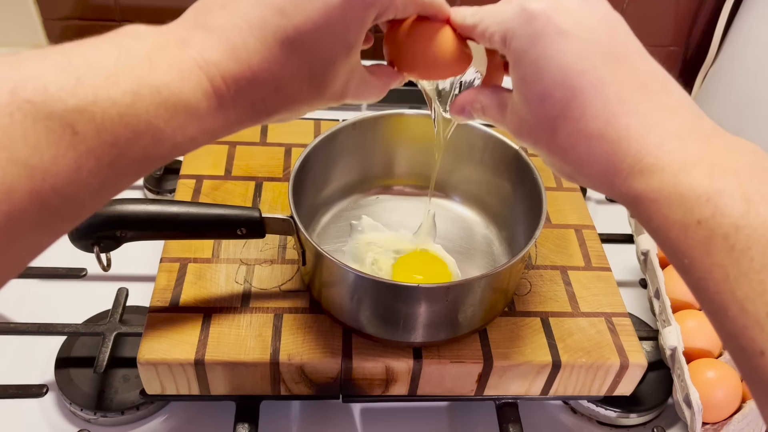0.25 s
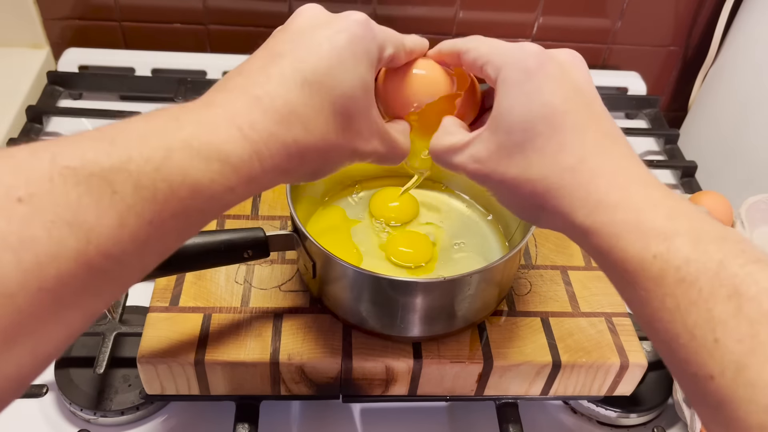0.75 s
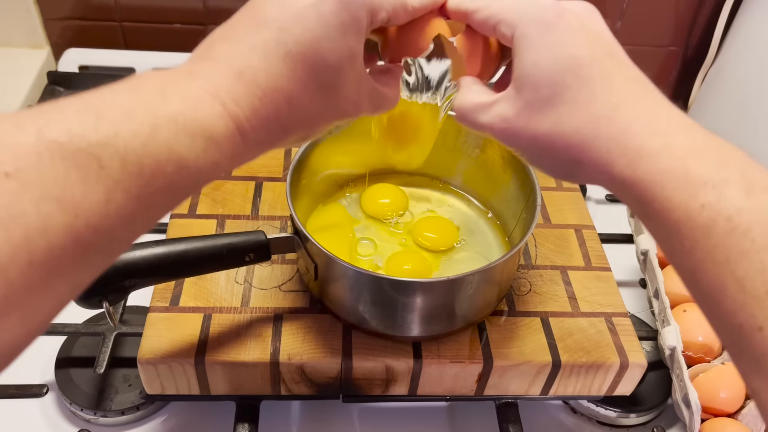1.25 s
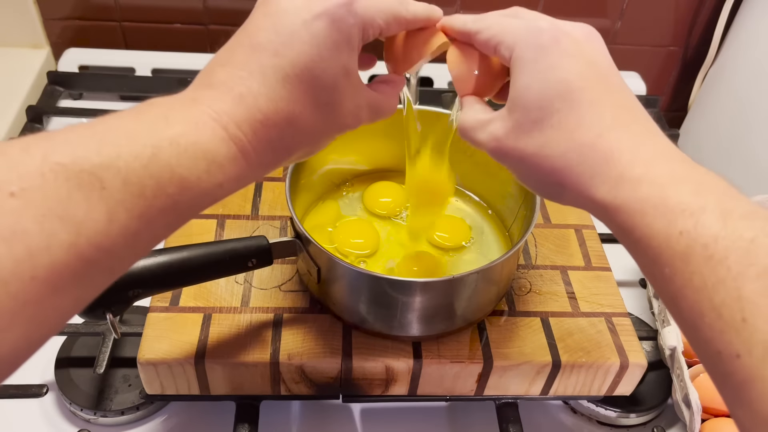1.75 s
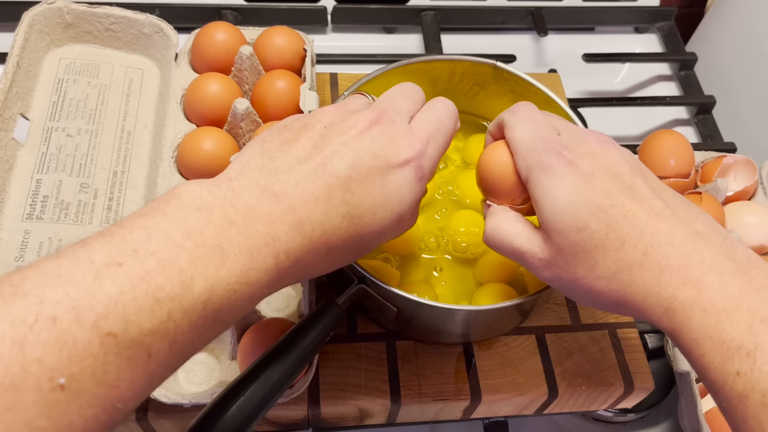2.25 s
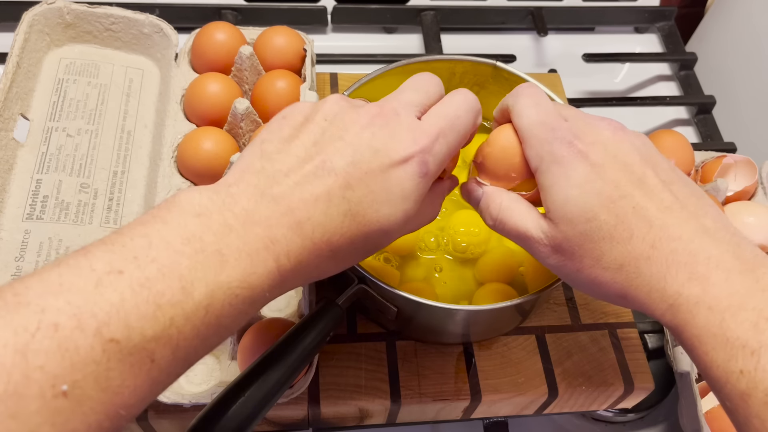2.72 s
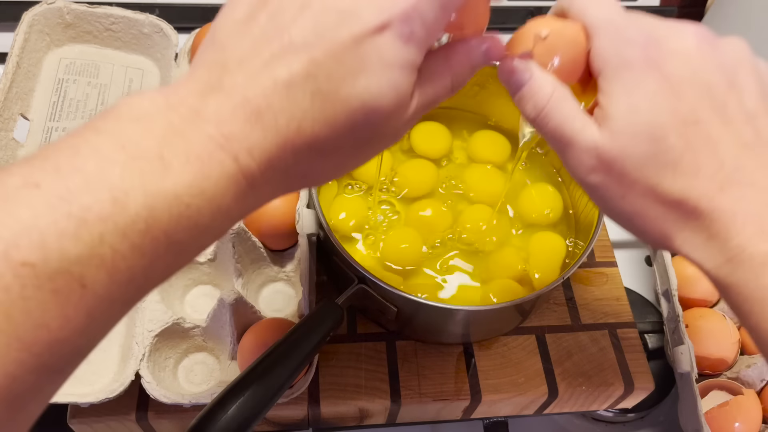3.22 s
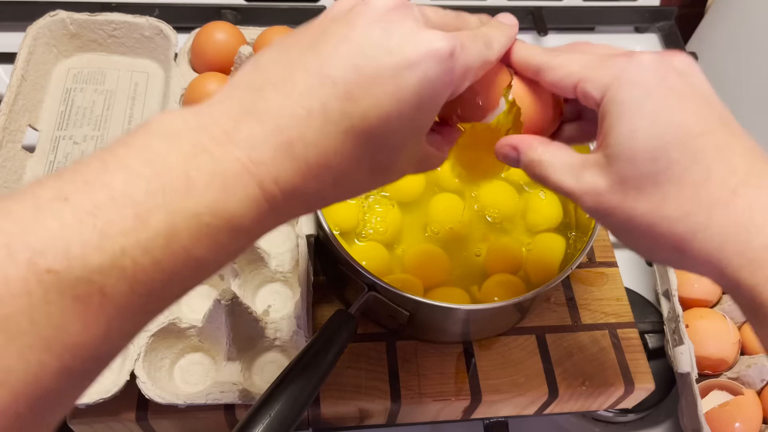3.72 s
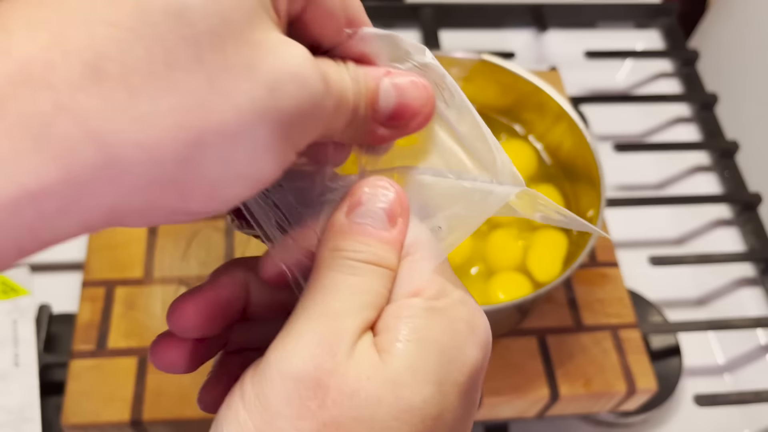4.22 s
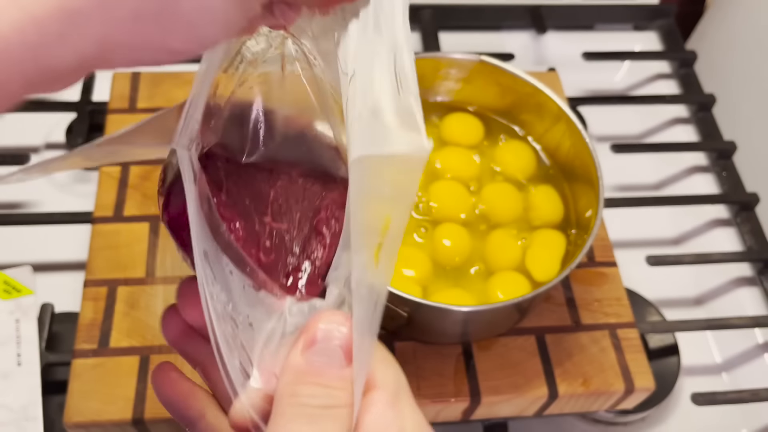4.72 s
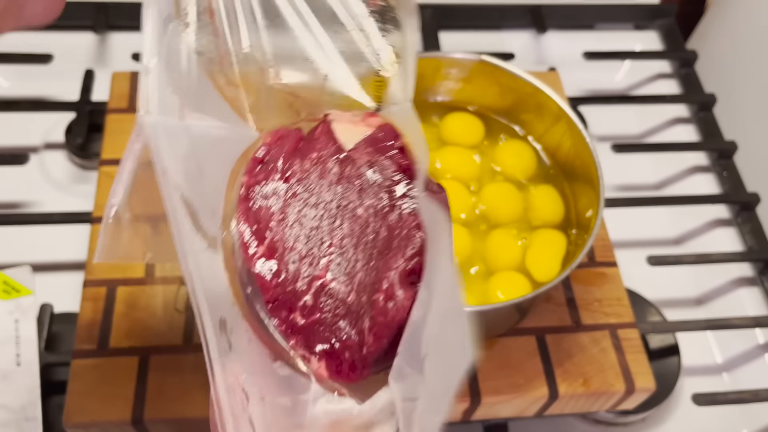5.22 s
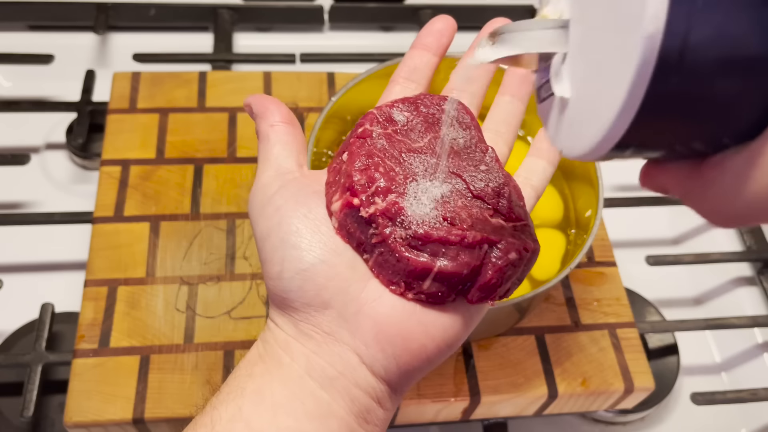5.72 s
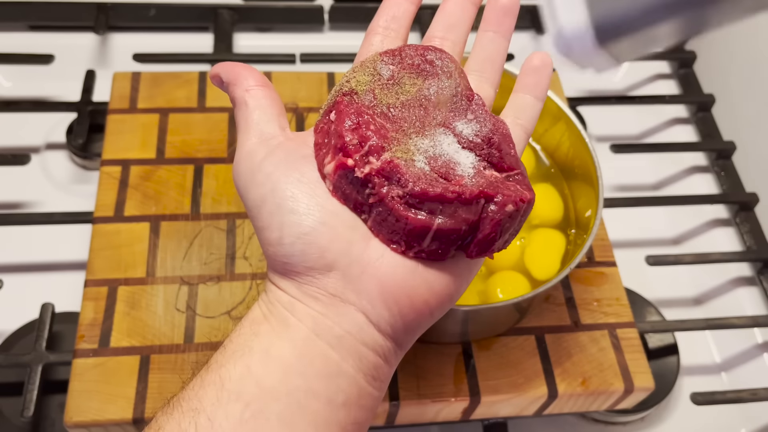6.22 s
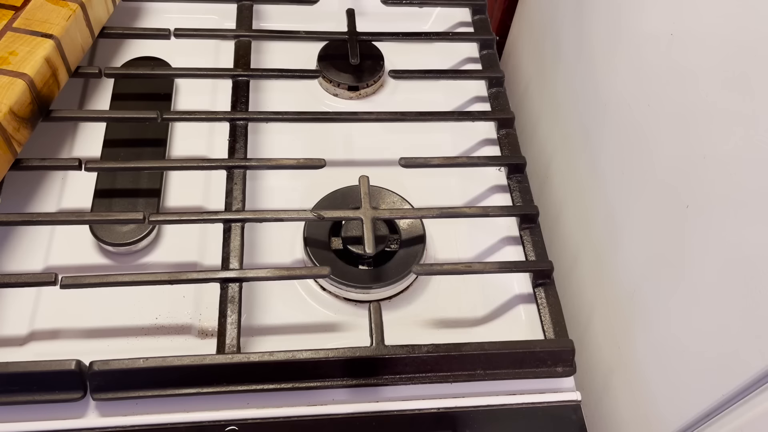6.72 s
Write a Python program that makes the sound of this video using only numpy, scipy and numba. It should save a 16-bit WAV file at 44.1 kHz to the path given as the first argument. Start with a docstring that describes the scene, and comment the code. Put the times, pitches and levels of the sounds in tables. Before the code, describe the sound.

Close stereo sound of cooking: a rapid run of brittle, wet eggshell cracks and crumbling, ringing slightly in a metal pan, growing louder and denser before easing off. Next come harsh plastic crinkles, hard snaps and a short tear. Quiet grainy seasoning and tiny lid ticks follow, then two bright, sharp stove sparks and a soft rush of gas catching. A low appliance hum stays beneath, with short room echo.

```python
"""A fridge hums throughout in a small kitchen, made from shaped noise and one low tone. Eggs are broken by hand
over a pan: bursts of noise ring the shells and the pan, crumbs crackle, soft knocks fall, egg white squelches.
Then a stiff plastic bag rustles, snaps, creaks and tears, made from clicks, bursts, hiss and short sinking tones.
Salt pours and pepper is shaken out as grainy hiss and rattle, and a gas ring sparks twice and catches in
fluttering noise. A pair of close microphone ports listens."""
import sys
import numpy as np
from scipy import signal
from scipy.fft import rfft, irfft, next_fast_len
from scipy.io import wavfile
from scipy.ndimage import uniform_filter1d
from numba import njit

SR = 44100
rng = np.random.default_rng(int(sys.argv[2]) if len(sys.argv) > 2 else 0)


def digitize_waveform(pressure):
    """Quantize a signal to 16-bit integers and store it at the path in sys.argv[1].

    Rows of a 2-D input are taken as channels; values are limited to [-1, 1].
    """
    field = np.atleast_2d(pressure).T
    bounded = np.clip(field, -1, 1)
    quanta = np.round(bounded * 32767).astype(np.int16)
    wavfile.write(sys.argv[1], SR, quanta)


def elevation(decibels):
    """Turn decibel levels (scalar or array-like) into linear amplitude ratios."""
    levels = np.asarray(decibels, float)
    return 10 ** (levels / 20)


N = 306891

# Steady kitchen sound. Each row: frequency in Hz, strength in dB per Hz.
ROOM_TONE = [(24, -33.5), (40, 1.5), (122, -3.5), (156, -10.5), (186, -7.5), (212, -11.5), (244, -7.5),
             (310, -17), (418, -24.5), (865, -35.5), (1880, -37.5), (4070, -43.5), (7100, -45.5),
             (9260, -33.5), (11200, -40.5), (12200, -61)]
ROOM_TONE_DB, HUM_HZ, HUM_DB = -61.5, 119, -66
# Shell crumbling between the fingers. Each row: time in seconds, level in dB, middle ring in Hz.
CRUNCH = [(0.0, -60, 2440), (0.3, -85, 3000), (0.83, -61.5, 1700), (1.05, -87, 1600), (1.2, -70.5, 2140),
          (1.48, -78.5, 2170), (1.68, -75, 1300), (1.75, -101, 1530), (1.82, -61, 2770), (2.01, -78, 1240),
          (2.118, -65, 1260), (2.135, -70.5, 2000), (2.31, -59.5, 2910), (2.53, -64.5, 2600),
          (2.62, -46.5, 2250), (2.93, -51, 2160), (3.01, -69, 2320), (3.42, -72, 2260), (3.53, -72.5, 1920),
          (3.57, -56.5, 1530), (3.75, -70.5, 1410), (4.11, -100, 2810)]
CLUMP_DB = 3.5   # unevenness of the crumbling
# Hard crumbling is bright; below a level in dB the treble falls away, in dB per dB.
CRUNCH_TREBLE_DB, BRIGHT_ABOVE_DB, TREBLE_FADES = 2, -63, 0.22
# Air in the pan. Each row: frequency in Hz, width in Hz, strength in dB.
PAN_AIR = [(594, 276, 9), (1260, 35, 1)]
# How the pan's air answers, most when the hands reach down into it.
# Each row: time in seconds, answer in dB before the drive below is added.
PAN_ANSWER = [(0.0, -43), (0.14, -9), (0.19, -23), (0.7, -40), (0.785, -20), (0.85, -19), (1.5, -39),
              (2.0, -25), (2.17, -16), (2.21, 0), (2.33, -12.5), (2.6, -13), (2.8, -26), (3.3, -27),
              (4.1, -15)]
CRACK_IN_PAN_DB, CRUNCH_IN_PAN_DB = 7.5, 10   # how hard a crack and the crumbling drive that air
# Shell cracks; each layer adds its own trim to the levels. Each row: start in seconds, level in dB,
# ring of the hollow shell in Hz, treble in dB against the level, wetness from 0 to 1.
CRACKS = [(0.1009, -37, 2820, -0.5, 0.6), (0.136, -39, 1380, 1, 0.6), (0.1848, -37, 2600, -0.5, 0.45),
          (0.1902, -23, 3260, -6, 0.64), (0.267, -47.5, 3000, -0.5, 0.8), (0.372, -67, 2000, 6.5, 1),
          (0.4436, -32.5, 2420, -12, 0.24), (0.497, -51.5, 1230, -9, 1), (0.525, -51, 2900, 7.5, 0.4),
          (0.531, -45, 2850, 2.5, 0.44), (0.599, -34.5, 1700, -3, 0.27), (0.636, -43, 2740, -12, 0.14),
          (0.684, -37.5, 1690, -3, 0.4), (0.712, -37.5, 1940, -10, 0.45), (0.744, -42, 1800, -24, 0.7),
          (0.7846, -39, 2560, -7, 0.2), (0.786, -30.5, 1340, -6, 1), (0.849, -39.5, 1380, -9, 1),
          (0.952, -45.5, 1340, -6.5, 0.7), (1.0194, -54.5, 1730, 7.5, 0.7), (1.111, -50, 1830, 0, 0.4),
          (1.135, -53.5, 1720, 11, 0.7), (1.175, -43.5, 2280, 3.5, 0.6), (1.2044, -34, 2200, -3, 0.32),
          (1.238, -44.5, 1460, 7, 0.32), (1.281, -29, 2090, -12, 0.42), (1.377, -45, 3100, -3.5, 0.36),
          (1.415, -35, 2490, -18, 0.65), (1.452, -36.5, 2000, -17, 0.48), (1.5643, -25, 1920, -17.5, 0.51),
          (1.6304, -32.5, 1510, -17, 0.64), (1.665, -22.5, 1444, -17.5, 0.82),
          (1.7642, -39, 1900, -18, 0.7), (1.8048, -43.5, 2100, -2, 0.6), (1.8203, -20.5, 4250, -37, 0.06),
          (1.916, -27, 2140, -26, 1), (1.9288, -23.5, 2220, -28, 0.4), (1.938, -8, 2110, -25, 0.54),
          (1.95, -13, 1950, -22.5, 0.63), (1.9759, -18, 1530, -24, 0.82), (1.9908, -21, 1550, -14, 0.6),
          (2.0095, -17.5, 1490, -20, 0.05), (2.015, -27, 1660, -22, 1), (2.192, -44, 3100, -3, 0.4),
          (2.2055, -30, 2830, -15, 0.5), (2.2196, -51, 2840, 15.5, 0.7), (2.2518, -50.5, 1030, 14, 0.34),
          (2.3102, -41, 2700, 8, 0.3), (2.3174, -29, 2730, 1, 0.48), (2.339, -15.5, 3400, -12, 0.2),
          (2.389, -50, 2360, 11, 0.64), (2.4168, -56, 2770, 19, 0.6), (2.4806, -39, 3540, 7, 0.1),
          (2.4981, -34.5, 3580, 4.5, 0.5), (2.536, -32, 3610, -10, 0.23), (2.5522, -32.5, 2860, -3.5, 0.4),
          (2.566, -28.5, 3500, -15, 0.3), (2.583, -19, 2850, -8, 0.13), (2.596, -22, 2760, -10.5, 0.3),
          (2.62, -21, 1920, -5.5, 0.1), (2.644, -22.5, 994, 0.5, 0.08), (2.6748, -17, 2730, -9.5, 0.1),
          (2.7085, -27.5, 2660, 3, 0.2), (2.7203, -23.5, 3130, -3, 0.46), (2.731, -33.5, 3010, 8.5, 0.9),
          (2.757, -32, 2670, 7.5, 0.3), (2.7685, -30.5, 2000, -0.5, 0), (2.774, -47.5, 2450, 20.5, 0.5),
          (2.8076, -31, 3400, 1.5, 0.5), (2.8205, -34, 2200, -10, 0.3), (2.832, -8.5, 2900, -8.5, 0.21),
          (2.876, -17.5, 1750, -48.5, 0.27), (2.908, -22, 1760, -8, 1), (2.9127, -21, 2680, -10.5, 1),
          (2.948, -26.5, 1870, -6, 0.03), (3.021, -35.5, 2750, -5.5, 0.34), (3.05, -34.5, 2740, -4.5, 0.65),
          (3.091, -42, 2180, -1.5, 0.5), (3.1206, -44, 2280, -22, 0.15), (3.153, -41, 2780, -12, 0),
          (3.1747, -34, 2650, -19, 0.24), (3.2159, -41.5, 2720, 7, 0.18), (3.2269, -26, 2750, -6, 0.56),
          (3.257, -36, 1480, -9, 1), (3.2764, -30, 1500, -9, 0.2), (3.316, -29, 2780, -12.5, 0.1),
          (3.3443, -29.5, 2370, -10.5, 0.3), (3.4068, -18, 2590, -8, 0.12), (3.55, -31.5, 1580, -9.5, 1),
          (3.5741, -14.5, 1690, -4, 0.61), (3.629, -33.5, 1360, -28, 0.5), (3.6847, -34.5, 3170, 4, 0.2),
          (3.699, -32, 3120, -10, 0), (3.77, -35, 1440, -20.5, 0.33), (3.802, -43.5, 1400, -26, 0.7),
          (3.808, -48, 3310, 4.5, 0.7), (3.855, -53, 1860, -4.5, 0.74), (3.9407, -50, 1990, 1, 0.35),
          (4.013, -52, 2620, -2, 0.4)]
DRY_T60_S, WET_T60_S = 0.026, 0.15   # time to fall 60 dB for a dry and a fully wet shell
DULL_BELOW_DB, SWELL_S = -13.5, 0.0011   # cracks with less treble are muffled; their extra swelling time
RAGGED_DB, LUMP_S = 3.0, 0.003   # a fracture sputters as it dies: unevenness, spacing of the lumps
# The empty pan sings; egg damps it.
PAN_RING_HZ, PAN_RING_WIDTH_HZ, PAN_RING_DB, FILL_DB_PER_S = 5430, 140, -1.5, 18.5
# Echo of the walls. Each row: frequency in Hz, time in seconds to fall 60 dB.
KITCHEN_T60 = [(200, 0.21), (1500, 0.16), (5000, 0.25), (12000, 0.15)]
KITCHEN_DB = -12
# Soft knocks of hands, yolks and bag. Each row: start in seconds, peak in dB, pitch in Hz, number of cycles.
THUMPS = [(0.503, -40.5, 71.6, 2.2), (0.783, -46.5, 120, 2.2), (0.849, -46, 57, 2.2), (0.894, -44, 99, 3.1),
          (5.151, -37.5, 167, 2.2), (5.1925, -23.5, 600, 9.5), (6.038, -46, 52.4, 2.2)]
# Air in egg white. Each row: time in seconds, pitch in Hz, level in dB.
SQUELCH = [(3.7, 1060, -54.5), (3.765, 1285, -62), (3.772, 1290, -65)]
# Bag rustling. Each row: time in seconds, crinkle in dB, flap in dB.
RUSTLE = [(4.11, -66.5, -86), (4.144, -66, -65.5), (4.266, -58, -86), (4.444, -42, -45), (4.746, -65, -70),
          (5.008, -37.5, -23), (5.06, -58.5, -81), (5.132, -58.5, -59.5), (5.202, -57, -38),
          (5.304, -63.5, -70.5), (5.36, -66, -67.5)]
# Tone of the fine creases. Each row: frequency in Hz, strength in dB per Hz.
CRINKLE = [(410, -39), (700, -22), (984, -21), (1230, -4.5), (2880, -7.5), (8760, -9), (10100, -7.5),
           (11500, -13), (16000, -49.5)]
# Tone of the flapping sheet. Each row: frequency in Hz, strength in dB per Hz.
FLAP = [(40, -20.5), (100, -3), (350, -6.5), (600, -0.5), (1000, -13.5), (1800, -28)]
# Bag folds snapping; each layer adds its own trim to the levels. Each row: start in seconds, level in dB,
# flap of the sheet in dB against the level, flap pitch scale in Hz, treble in dB against the level.
SNAPS = [(4.123, -41, -22, 326, 3.5), (4.149, -39.5, -28, 318, 3), (4.1719, -41.5, -23, 820, -7),
         (4.295, -40.5, -37, 240, 7), (4.3262, -30, -38.5, 820, -4), (4.343, -34.5, -38.5, 810, -1.5),
         (4.3805, -26, -49.5, 789, -2.5), (4.4025, -24, -21, 850, -1), (4.4052, -9.5, -37.5, 860, 3.5),
         (4.409, -14.5, -18.5, 868, 0.5), (4.4188, -20, -19.5, 820, 3.5), (4.4215, -7.5, -18, 805, -10),
         (4.4334, -12, -14, 814, -13.5), (4.4675, -22, -12, 226, -10), (4.5123, -22, -21, 583, -4.5),
         (4.543, -34, 2, 890, -30), (4.556, -29.5, -10, 393, -34), (4.5995, -30.5, 0.5, 304, -10),
         (4.658, -57.5, 12.5, 594, -13), (4.7021, -45.5, -9, 247.8, 4.5), (4.7175, -32.5, -13, 613, 0),
         (4.7261, -36, -4, 520, -12.5), (4.8235, -18, -8, 375, -12), (4.925, -23, -9, 570, -3),
         (4.9491, -5, -17, 570, -12.5), (4.9714, -12.5, -9.5, 570, -1), (4.9873, -21, -3.5, 645, -14),
         (5.007, -22, 0, 750, -1), (5.104, -40, -13.5, 579, -3.5), (5.118, -51, 7.5, 579, -16),
         (5.1852, -35.5, 5, 1200, -16.5), (5.188, -21.5, -8, 873, -2), (5.1941, -24, -9.5, 587.3, -15),
         (5.2255, -41, 11.5, 330, -16), (5.2452, -25.5, -7, 810, -13)]
FOLD_T60_S = 0.079   # basic time for a fold to fall 60 dB, scaled in each layer
# Taut film creaking before it gives. Each row: time in seconds, level in dB.
CREAK = [(4.29, -66), (4.33, -45), (4.36, -53.5), (4.38, -64)]
CREAK_HZ, CREAK_WIDTH_HZ = 1600, 600
# The bag ripped wide. Each row: time in seconds, level in dB, dull part in dB against the crinkle.
TEAR = [(4.86, -65.5, 0.5), (4.905, -47, -8.5), (4.93, -27.5, -9), (4.95, -22.5, 2.5), (4.98, -29.5, -0.5),
        (5.01, -44.5, 6), (5.035, -60, 1), (5.06, -66, 10)]
# Shaker lid ticking. Each row: start in seconds, peak in dB, pitch in Hz.
TICKS = [(5.354, -62, 1750), (5.5186, -47, 1610), (5.651, -52, 1560), (5.9555, -69, 1740),
         (6.0186, -63, 1513), (6.149, -62.5, 2280)]
# Salt pouring from the spout. Each row: time in seconds, hiss in dB.
POUR = [(5.36, -59.5), (5.47, -55), (5.5, -61), (5.54, -56.5), (5.655, -61.5), (5.69, -66.5), (5.74, -64),
        (5.82, -85.5), (5.88, -76), (5.95, -65), (5.97, -91.5)]
# Rattle at full flow, and dB lost per dB of flow.
POUR_RATTLE_DB, FULL_FLOW_DB, RATTLE_FOLLOWS = -67, -57, 2.03
# Pepper pot jerked down. Each row: time in seconds, hiss in dB.
SHAKES = [(5.965, -83.5), (6.097, -77), (6.23, -67), (6.362, -68), (6.508, -67.5)]
# Grains fall back: delay and added level; rise and fall of each hiss; rattle against hiss.
RETURN_S, RETURN_DB, SHAKE_FADE_DB_PER_S, SHAKE_RATTLE_DB = 0.051, 5.5, 560.5, -2
# Igniter sparks. Each row: start in seconds, peak in dB, basic dying time in seconds, scaled in the parts.
SPARKS = [(6.5895, -4.5, 0.22), (6.8024, 0.5, 0.13)]
# Tone of a spark. Each row: frequency in Hz, strength in dB per Hz.
SPARK_TONE = [(290, -19), (500, -22.5), (1530, -21.5), (1670, -21), (3200, -14.5), (3490, -13.5),
              (8830, -8.5), (11500, 17), (13800, -8.5), (16000, -23.5)]
# Gas flowing and catching. Each row: time in seconds, hiss in dB, flame in dB before a fixed lift.
GAS = [(6.6, -69, -59.5), (6.66, -59.5, -84), (6.78, -54.5, -75), (6.82, -53, -54), (6.9, -65, -63),
       (6.93, -45, -42), (6.959, -44, -39.5)]
# Left over right in dB, one number each for eggs, bag, shakers and stove.
PANS = (-0.9, 0.66, -1.6, 0.69)
# Phase between the ports. Each row: frequency in Hz, radians by which left leads.
PORT_LEAD = [(0, 0), (1890, -0.1), (3100, 1.4), (4220, 0.3), (5340, 0.8), (6800, 0.2), (7920, 1.1),
             (8790, -0.5), (11800, -6.0), (12400, -6.5), (13300, -9.0), (14200, -9.8), (14900, -12.2),
             (16400, -13.1)]
# Loudness between the ports. Each row: frequency in Hz, left over right in dB.
PORT_BALANCE = [(60, 2.5), (110, 2), (200, 3.5), (380, 5), (700, 3.5), (1290, 6.5), (2380, 2), (4400, 3.5),
                (8120, 2), (15000, -1.5)]
# Treble of the microphones. Each row: frequency in Hz, gain in dB.
MIC_TOP = [(9900, -1), (10250, -5), (10600, 3.5), (12200, -9), (12900, -20), (13600, -18.5), (15500, -20.5),
           (17000, -51)]


def rms_one(x):
    """Scale to unit power."""
    return x / np.sqrt(np.mean(x ** 2) + 1e-20)


def in_time(rows):
    """Return a gate that is open while a curve lasts, then the curve's columns at every sample."""
    s, *columns = np.transpose(rows)
    t = np.arange(N) / SR
    gate = uniform_filter1d(1. * ((t >= s[0]) & (t <= s[-1])), size=200)
    return [gate] + [np.interp(t, s, c) for c in columns]


def at_hz(points, hz):
    """Read a table on a log-frequency axis."""
    f, v = np.transpose(points)
    return np.interp(np.log(hz + 1), np.log(f + 1), v)


def colour(x, spectrum):
    """Give a wide sound a spectrum, at unit power."""
    hz = np.fft.rfftfreq(x.shape[-1], 1 / SR)
    return rms_one(irfft(rfft(x) * elevation(at_hz(spectrum, hz)), x.shape[-1]))


def band(x, low_hz, high_hz):
    """Keep mainly the sound between two frequencies."""
    high_hz = min(high_hz, SR * .45)
    return signal.sosfilt(signal.butter(2, [low_hz, high_hz], "band", fs=SR, output="sos"), x)


def peak(x, hz, width_hz):
    """Ring at one fixed resonance."""
    return signal.lfilter(*signal.iirpeak(hz, hz / width_hz, SR), x)


@njit
def moving_ring(x, hz, width_hz, sr):
    """Ring at a resonance whose centre wanders."""
    out, r = np.zeros(len(x)), np.exp(-np.pi * width_hz / sr)
    for i in range(2, len(x)):
        push = x[i] - x[i - 2]
        out[i] = push + 2 * r * np.cos(2 * np.pi * hz[i] / sr) * out[i - 1] - r * r * out[i - 2]
    return out


def grains(per_s, spread_db, hiss):
    """Random clicks of uneven size over some hiss, at unit power."""
    sizes = elevation(spread_db * np.minimum(rng.exponential(1, N), 4)) * rng.choice([-1, 1], N)
    clicks = rms_one(sizes * (rng.random(N) < per_s / SR))
    return rms_one(clicks + hiss * rng.standard_normal(N))


def burst(t60, click):
    """A fracture: a click, a quick spit, then a ragged dying rush of noise."""
    t = np.arange(SR // 6) / SR
    lumps = np.interp(t, np.arange(60) * LUMP_S, rng.standard_normal(60))
    dying = elevation(RAGGED_DB * lumps - 60 * t / t60) + 2.5 * elevation(-60 * t / 0.0085)
    rush = rng.standard_normal(len(t)) * dying
    rush[0] = click * np.sign(rush[0])
    return rush


def add(out, s, piece, db):
    """Lay a short sound down at a time and peak level."""
    i = round(s * SR)
    out[i:i + len(piece)] += (elevation(db) * piece / np.abs(piece).max())[:N - i]


def room_tone():
    """Appliance rumble, nearly alike in both ports, with a wavering mains hum."""
    mid, side = rng.standard_normal((2, N))
    air = colour(mid + 0.14 * side * [[1], [-1]], ROOM_TONE)
    waver = rms_one(band(rng.standard_normal(N), HUM_HZ - 6, HUM_HZ + 6))
    hum = np.sqrt(2) * np.sin(2 * np.pi * HUM_HZ * np.arange(N) / SR) + 0.4 * waver
    return elevation(ROOM_TONE_DB) * air + elevation(HUM_DB) * hum


def pan_air(x):
    """The open pan booms along: its air rings at its resonances."""
    return sum(elevation(db) * peak(x, hz, width) for hz, width, db in PAN_AIR)


def crunch():
    """Dense small fractures and wet smacks over hiss, ringing around the pitch of the opening shell."""
    gate, db, hz = in_time(CRUNCH)
    # pieces give way in bunches
    clumps = elevation(CLUMP_DB * rms_one(band(rng.standard_normal(N), 19.3, 31)))
    push = clumps * grains(450, spread_db=1.0, hiss=1.0)
    smacks = 0
    for ratio, share in [(.72, 0.17), (1, 0.31), (1.38, 0.55)]:
        smack = moving_ring(grains(190, spread_db=2.0, hiss=0.27), ratio * hz, 250.0, SR)
        smacks = smacks + share * rms_one(smack)
    body = rms_one(smacks + 0.38 * rms_one(band(push, 830, 2700)))
    treble_db = CRUNCH_TREBLE_DB + TREBLE_FADES * np.minimum(db - BRIGHT_ABOVE_DB, 0)
    body += elevation(treble_db) * rms_one(band(push, 5800, 11500))
    body += elevation(in_time(PAN_ANSWER)[1] + CRUNCH_IN_PAN_DB) * rms_one(pan_air(push))
    return gate * elevation(db) * body


def cracks():
    """Each fracture rings the hollow shell and the air in the pan and spits treble; a wet one lasts longer."""
    out, edge, spit, boom = np.zeros((4, N))
    for s, db, hz, treble_db, wet in CRACKS:
        t60 = DRY_T60_S + wet * (WET_T60_S - DRY_T60_S)
        # muffled by egg white: slow to swell, narrow
        dull = np.clip((DULL_BELOW_DB - treble_db) / 6, 0, 1)
        push = burst(t60, click=0.35)
        # wet shells give softly
        swell_s = 0.0013 + SWELL_S * dull
        push *= 1 - wet * np.exp(-np.arange(len(push)) / (swell_s * SR))
        # every broken shell has a second ring of its own
        shape = rng.uniform(.45, 1.5)
        hollow = peak(push, hz, hz / 5.05) - .5 * peak(push, shape * hz, hz / 3.37)
        add(out, s, band(hollow, 0.42 * hz, 4230), db - 10.0)
        top_hz = 3900 - dull * max(3900 - 1.82 * hz, 0)
        add(out, s, band(push, 0.5 * hz, top_hz), db - 10.5 - 4.4 * dull)
        add(spit, s, burst(0.9 * t60, click=3.5), db + treble_db + 10.0)
        add(edge, s, push, db + 0.17 * treble_db + 2.5 - 11.0 * dull)
        add(boom, s, push, db + np.interp(s, *np.transpose(PAN_ANSWER)) + CRACK_IN_PAN_DB)
    sing_db = PAN_RING_DB - FILL_DB_PER_S * np.arange(N) / SR
    sing = elevation(sing_db) * peak(edge, PAN_RING_HZ, PAN_RING_WIDTH_HZ)
    treble = band(band(spit, 7240, 17000), 3260, 12500) + 0.8 * peak(spit, 9980, 1400)
    return out + sing + band(edge, 4650, 5480) + treble + pan_air(boom)


def kitchen(x):
    """Walls answer with noise that dies octave by octave, partly alike in both ports."""
    t = np.arange(SR // 2) / SR
    tail = 0
    for hz in 100 * 2. ** np.arange(8):
        mid, side = rng.standard_normal((2, len(t))) * (t > .002)
        dying = elevation(-60 * t / at_hz(KITCHEN_T60, hz * np.sqrt(2)))
        tail = tail + band(mid + 2.4 * side * [[1], [-1]], hz, 2 * hz) * dying
    return signal.fftconvolve(x[None], tail / np.sqrt(np.sum(tail[0] ** 2)), axes=1)[:, :N]


def thumps():
    """A soft blow is a few cycles of smooth push."""
    out = np.zeros(N)
    for s, db, hz, cycles in THUMPS:
        t = np.arange(int(cycles * SR / hz)) / SR
        add(out, s, np.sin(2 * np.pi * hz * t) * np.hanning(len(t)), db)
    return out


def squelch():
    """Air in egg white sings a sliding tone of gurgling strength."""
    on, pitch, squelch_db = in_time(SQUELCH)
    gurgle = 1 + 0.38 * rms_one(band(rng.standard_normal(N), 40, 170))
    return on * gurgle * elevation(squelch_db) * np.sin(2 * np.pi * np.cumsum(pitch) / SR)


def rustle():
    """Fine creases crinkle in dense clicks and hiss while the sheet flaps in lower, sparser clicks and hiss."""
    gate, crinkle_db, flap_db = in_time(RUSTLE)
    crinkle = elevation(crinkle_db) * colour(grains(1500, spread_db=4.0, hiss=0.94), CRINKLE)
    flap = elevation(flap_db) * colour(grains(480, spread_db=4.5, hiss=0.38), FLAP)
    return gate * (crinkle + flap)


def snaps():
    """Folds snap in bursts of noise, and the sheet between them flaps with a short sinking tone."""
    out, t = np.zeros(N), np.arange(SR // 10) / SR
    for s, db, flap_db, hz, treble_db in SNAPS:
        add(out, s, band(burst(FOLD_T60_S, click=13.0), 1100, 3700), db - .6)
        add(out, s, band(burst(0.89 * FOLD_T60_S, click=1.7), 5200, 17000), db + treble_db + 8.5)
        # the sheet slackens, so the pitch sinks; this counts its cycles
        sink = hz * 0.0065 * (1 - np.exp(-t / 0.0038)) + 0.27 * hz * t
        thud = np.sin(2 * np.pi * sink) * elevation(-60 * t / 0.048)
        rough = band(burst(2.0 * FOLD_T60_S, click=3.0), 150, 510)[:len(t)]
        add(out, s, thud + 0.36 * rough, db + flap_db + 0.5)
    return out


def creak():
    """Taut film creaks as uneven clicks and a little hiss ring at one broad resonance."""
    taut, creak_db = in_time(CREAK)
    push = grains(700, spread_db=5.0, hiss=0.3)
    return taut * elevation(creak_db) * rms_one(peak(push, CREAK_HZ, CREAK_WIDTH_HZ))


def tear():
    """A seam gives way in a swelling run of dense clicks and hiss, duller as the sheet slackens."""
    gate, db, dull_db = in_time(TEAR)
    push = grains(2500, spread_db=2.5, hiss=1.0)
    return gate * elevation(db) * (colour(push, CRINKLE) + elevation(dull_db) * rms_one(band(push, 300, 2900)))


def lid_ticks():
    """The shaker lid rings briefly at one pitch when a burst strikes it."""
    out = np.zeros(N)
    for s, db, hz in TICKS:
        push = burst(0.097, click=1.9)
        add(out, s, peak(push, hz, 200) + 0.071 * push, db)
    return out


def shakers():
    """Fine grains hiss as they pour and rattle against the shaker wall, twice for each shake."""
    gate, flow_db = in_time(POUR)
    t = np.arange(N) / SR
    shaken = 0
    for s, db in SHAKES:
        for late, back_db in [(0, 0), (RETURN_S, RETURN_DB)]:
            shaken = shaken + elevation(db + back_db - SHAKE_FADE_DB_PER_S * np.abs(t - s - late))
    hiss = rms_one(band(grains(1500, spread_db=3.0, hiss=0.52), 8830, 11100))
    knock = grains(2000, spread_db=1.0, hiss=0.71)
    # the hollow tub
    rattle = rms_one(peak(knock, 1870, 850) + 0.71 * band(knock, 580, 9100) + 1.9 * peak(knock, 675, 220))
    rattle_db = POUR_RATTLE_DB + RATTLE_FOLLOWS * (flow_db - FULL_FLOW_DB)
    poured = elevation(flow_db) * hiss + elevation(rattle_db) * rattle
    return gate * poured + shaken * (hiss + elevation(SHAKE_RATTLE_DB) * rattle)


def sparks():
    """Two sparks jump and scatter among the iron grates, then about the walls, as dying bands of noise."""
    out, t = np.zeros(N), np.arange(SR // 2) / SR
    lows = 250 * 2 ** np.arange(0, 6, .5)   # bottom of each half-octave band, in Hz
    for s, db, t60 in SPARKS:
        dying = elevation(-60 * t / (0.25 * t60)) + elevation(-14 - 60 * t / (1.3 * t60)) + elevation(-38.0 - 60 * t / 2.0)
        scatter = rng.standard_normal((len(lows), len(t))) * dying
        spark = 0
        for hz, noise in zip(lows, scatter):
            # read the tone near the middle of the band
            spark = spark + elevation(at_hz(SPARK_TONE, hz * 2 ** 0.26)) * band(noise, hz, hz * np.sqrt(2))
        add(out, s, spark, db)
    return out


def gas():
    """Flowing gas hisses through two close resonances, and the flame flutters as low noise."""
    gate, hiss_db, flame_db = in_time(GAS)
    air = rng.standard_normal(N)
    hiss = rms_one(peak(peak(air, 824, 170), 890, 210) + 0.24 * band(air, 210, 2200))
    flame = rms_one(band(rng.standard_normal(N), 53, 264))
    return gate * (elevation(hiss_db) * hiss + elevation(flame_db + 4.0) * flame)


def scene():
    """Place the near sounds left or right, then add knocks, the echo of the handwork and the room tone."""
    eggs = crunch() + cracks() + squelch()
    bag = rustle() + snaps() + creak() + tear()
    hands = [eggs, bag, lid_ticks() + shakers()]
    stove = sparks() + gas()
    near = sum(x * elevation([[db / 2], [-db / 2]]) for x, db in zip(hands + [stove], PANS))
    return near + thumps() + elevation(KITCHEN_DB) * kitchen(sum(hands)) + room_tone()


def band_limit(x):
    """A steep low-pass at the top of the band."""
    return signal.sosfilt(signal.butter(12, 16820, fs=SR, output="sos"), x)


def record(dry):
    """The two ports differ in level and phase, the same way for every sound; the top rolls off."""
    size = next_fast_len(N + 2048)
    hz = np.fft.rfftfreq(size, 1 / SR)
    # half the difference goes to the left port, the opposite half to the right
    lead = np.interp(hz, *np.transpose(PORT_LEAD))
    half = elevation(at_hz(PORT_BALANCE, hz) / 2) * np.exp(.5j * lead)
    heard = rfft(dry, size) * elevation(at_hz(MIC_TOP, hz)) * np.array([half, 1 / half])
    ports = irfft(heard, size)[:, :N]
    return band_limit(np.clip(ports, -1, 1))


dry = scene()
out = record(dry)
digitize_waveform(out)
```